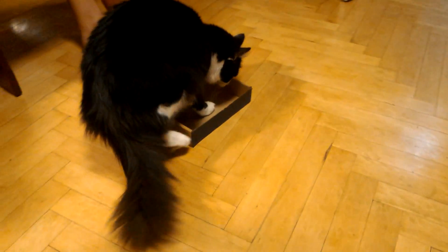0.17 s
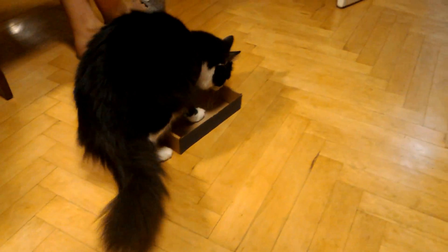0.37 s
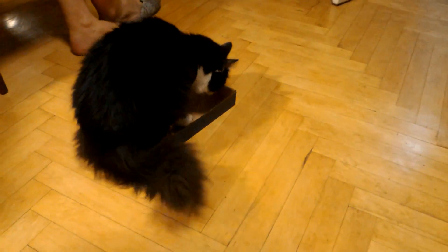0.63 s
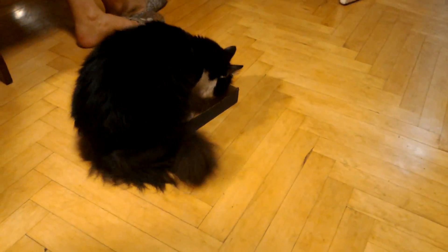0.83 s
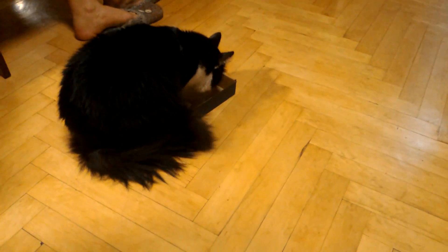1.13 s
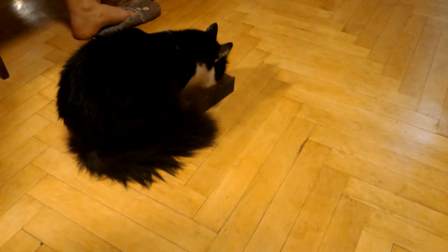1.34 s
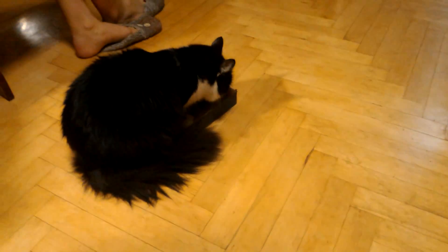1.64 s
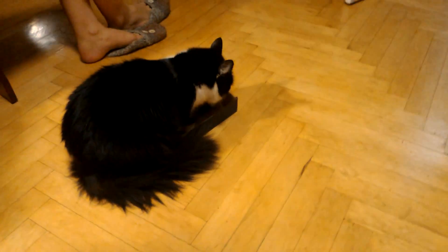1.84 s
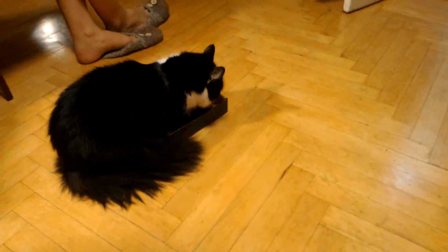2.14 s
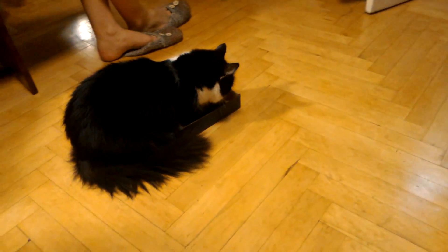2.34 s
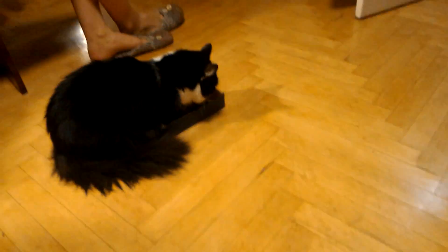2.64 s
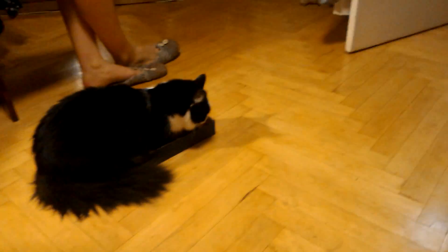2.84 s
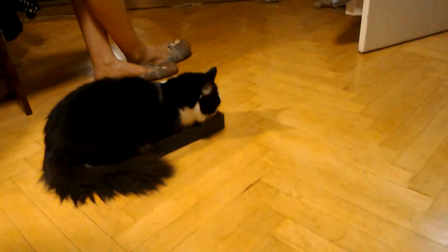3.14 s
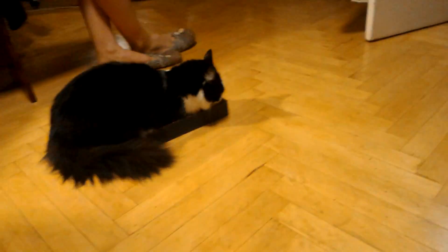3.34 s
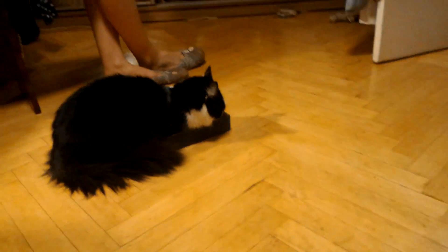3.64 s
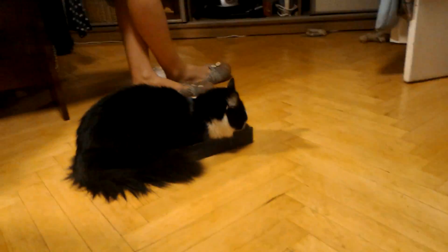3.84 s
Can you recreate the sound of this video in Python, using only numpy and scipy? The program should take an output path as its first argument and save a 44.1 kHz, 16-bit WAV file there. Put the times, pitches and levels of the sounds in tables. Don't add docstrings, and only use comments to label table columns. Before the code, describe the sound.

Handling knocks on a camera's hollow shell, extremely close. Steady soft room hiss comes first, with a tiny sharp tick at 0.7 s and faint dry finger rubs and clicks from 1 s, fuller around 2.4-2.9 s. Three light taps at 3.2-3.3 s lead to hard, thumping, rattling knocks at 3.4, 3.5 and 3.6 s, brief scuffing, then two more around 3.9 s. The cat is nearly silent.

```python
import sys
import numpy as np
from scipy import signal
from scipy.fft import rfft, irfft, next_fast_len
from scipy.io import wavfile
from scipy.ndimage import uniform_filter1d, minimum_filter1d, map_coordinates

SR = 44100
rng = np.random.default_rng(int(sys.argv[2]) if len(sys.argv) > 2 else 0)


def master(y):
    cut = np.clip(np.atleast_2d(y).T, -1, 1)
    pcm = np.round(cut * 32767)
    wavfile.write(sys.argv[1], SR, pcm.astype(np.int16))


def amplitude_ratio(level_db):
    exponent = np.asarray(level_db, float) / 20
    return 10 ** exponent


N = 176400


def unit(x):
    return x / np.sqrt(np.mean(x ** 2) + 1e-20)


def wobble(rate):
    knots = rng.standard_normal(int(N * rate / SR) + 4)
    return map_coordinates(knots, [np.arange(N) * rate / SR])


def filtered(x, response):
    size = next_fast_len(N + 8192)
    gain = response(np.fft.rfftfreq(size, 1 / SR))
    return irfft(rfft(x, size) * gain, size)[..., :N]


def noise(points, grain_db=0):
    f, db = np.transpose(points)
    white = rng.standard_normal(N) * amplitude_ratio(grain_db * rng.standard_normal(N))

    def colour(hz):
        return amplitude_ratio(np.interp(np.log(hz + 1), np.log(f + 1), db, left=-120, right=-120))

    return unit(filtered(white, colour))


def strokes(rows, dull, bright):
    low, high = np.zeros(N + SR), np.zeros(N + SR)
    for s, length, db, grow_db, share_db in rows:
        soft = 0.0037 + 0.086 * length
        t = np.arange(round((length + soft) * SR)) / SR
        onset_ratio = 2.5 if grow_db > 5 else 0.5
        edge = np.clip(np.minimum(t / onset_ratio, length + soft - t) / soft, 0, 1) ** 2
        press = amplitude_ratio(db + grow_db * (t / length - 0.5)) * edge
        at = round((s - soft / 4) * SR)
        low[at:][:len(t)] += press
        high[at:][:len(t)] += press * amplitude_ratio(share_db)
    flutter_db, grain_db = 1.8, 3.5
    dull_skin = amplitude_ratio(flutter_db * wobble(45)) * noise(dull, grain_db)
    bright_skin = amplitude_ratio(flutter_db * wobble(45)) * noise(bright, grain_db)
    return low[:N] * dull_skin + high[:N] * bright_skin


def rings(rows):
    out = np.zeros(N + SR)
    for s, db, hz, ms in rows:
        t = np.arange(round(ms * SR / 1000)) / SR
        u = t / t[-1]
        drift = (hz > 1000) * 0.11 * np.cumsum(rng.standard_normal(len(t)))
        swing = np.sin(2 * np.pi * hz * t + drift)
        soft_start = (1 - np.exp(-u / 0.097)) ** 2
        out[round(s * SR):][:len(t)] += amplitude_ratio(db + 8.5 - 60 * u) * swing * soft_start
    return out[:N]


# (frequency [Hz], level [dB per Hz])
ROOM = [(20, -21.5), (140, 1), (600, -7), (2300, -16), (3400, -21.5), (4800, -22), (6500, -29.5),
        (16200, -20)]
# (frequency [Hz], level [dB per Hz])
WHINE = [(1600, -26), (1800, 0), (2000, -20)]


def room():
    room_db, whine_db = -65, -83
    hiss = amplitude_ratio(room_db + 0.15 * wobble(5.6)) * noise(ROOM)
    return hiss + amplitude_ratio(whine_db) * noise(WHINE)


# (time [s], level [dB])
GRIP = [
    (0, -74.5),
    (2.3, -70.5),
    (2.9, -72.5),
    (3.38, -52.5),
    (3.5, -37.5),
    (3.75, -50),
    (4, -44),
]


def hand_rumble():
    grip_db = np.interp(np.arange(N) / SR, *np.transpose(GRIP))
    lump_db = 4.5
    return noise([(15, -3), (45, 0), (130, -22)]) * amplitude_ratio(grip_db + lump_db * wobble(25.01))


# (time [s], peak [dB], pitch [Hz], ring [ms])
TICKS = [(.7328, -27, 4670, 4.6), (.7328, -28.5, 7350, 4.1), (.7328, -25, 10300, 1.1),
         (.7328, -28, 14000, 1.6), (1.386, -48, 394, 12), (1.4755, -39.5, 5240, 6.5),
         (1.4755, -47, 10200, 4.4), (1.477, -42.5, 356, 7.5), (2.769, -36.5, 4700, 7.6),
         (3.623, -37, 800, 3.2), (3.721, -34.5, 440, 4.6), (3.8365, -30, 1200, 3.6),
         (3.8365, -38.5, 8200, 1.1), (3.846, -32, 460, 4.8), (1.773, -53, 59.7, 72), (2.776, -53, 45, 120)]


def nail_ticks():
    return rings(TICKS)


# (time [s], peak [dB], low edge [Hz], high edge [Hz])
SNAPS = [(.7331, -46.5, 1900, 2920), (1.3857, -49, 4000, 8000), (1.7734, -46, 3500, 8000),
         (1.904, -48, 6500, 15000), (1.9307, -51, 6500, 15000), (2.097, -59, 5940, 9100),
         (2.202, -59, 3500, 7000), (2.7688, -44, 1000, 6000), (2.7698, -34.5, 7500, 15500),
         (3.094, -45, 1800, 4500), (3.281, -36, 3500, 12000), (3.789, -54, 500, 2800),
         (3.8013, -51, 400, 2200), (3.812, -63, 1500, 2400), (3.8223, -50, 800, 2400),
         (3.834, -57, 600, 3000), (3.8375, -46, 1210, 3100), (3.87, -43, 400, 2600)]


def snaps():
    out = np.zeros(N + SR)
    t = np.arange(SR // 100) / SR
    t60 = 0.0026
    for s, db, low_hz, high_hz in SNAPS:
        burst = rng.standard_normal(len(t)) * amplitude_ratio(-60 * t / t60)
        band = signal.butter(4, [low_hz, high_hz], 'band', fs=SR, output='sos')
        burst = signal.sosfilt(band, burst)
        out[round(s * SR):][:len(t)] += amplitude_ratio(db) * burst / np.abs(burst).max()
    return out[:N]


# (time [s], length [s], level [dB], growth [dB], bright share [dB])
SLIDES = [(1.03, 0.094, -76.5, -4, -20), (1.21, 0.135, -75.5, 6, -3), (1.385, 0.083, -70.5, 0, -2.5),
          (1.478, 0.014, -59.5, -11, -14), (1.505, 0.028, -66, -4, -6), (1.625, 0.064, -75.5, -6, -7),
          (1.772, 0.057, -67.5, -2, -3.5), (1.943, 0.025, -56, 25, 7.5), (1.966, 0.022, -62, -13, 7.5),
          (2.17, 0.43, -76.5, 5, -2.5), (2.25, 0.0077, -64.5, -3, -5), (2.372, 0.058, -59, 6, -6),
          (2.476, 0.053, -61.5, 4, 4.5), (2.53, 0.11, -68, 23, -7), (2.6, 0.14, -49.5, 7.5, -9.5),
          (2.75, 0.095, -67, -14, -6), (2.775, 0.019, -61.5, -4, 0.5), (2.892, 0.056, -58, 0, -6),
          (2.89, 0.29, -69.5, -3, 3.5), (2.97, 0.02, -74, -5, -8), (3.045, 0.024, -67, 3, -1),
          (3.012, 0.023, -61.5, -1, -9), (3.135, 0.044, -73, 3.5, 8)]
GRIPS = [
    (0.736, 0.019, -63.5, -7, 1.4),
    (3.231, 0.033, -59.5, -16, 2.6),
    (3.282, 0.034, -63.5, -23, 1.7),
    (3.318, 0.037, -54, -7, 2),
    (3.215, 0.167, -72.5, -8, 1.8),
    (3.425, 0.04, -76.5, -15, 8),
    (3.492, 0.045, -71, -3, 3.8),
    (3.55, 0.04, -76.5, 6, 8.9),
    (3.596, 0.03, -67, -13, 4.4),
    (3.628, 0.085, -71, -1, 2.5),
]
# (frequency [Hz], level [dB per Hz])
DULL = [(1500, -40), (3200, -16), (4200, -10), (4850, -5), (6000, -7), (7600, 2), (9000, -8), (16200, -27)]
BRIGHT = [(4500, -22), (7000, -9), (9500, 2.5), (12000, -4), (14500, -2.5), (16200, -12)]


def finger_slides():
    return strokes([*SLIDES, *GRIPS], DULL, BRIGHT)


# (time [s], length [s], level [dB], growth [dB], upper share [dB])
RUBS = [(1.05, 0.11, -81.5, 3, -5), (1.2, 0.18, -75.5, 0, -5), (1.385, 0.078, -67.5, 2, 0),
        (1.505, 0.032, -65, -4, -9), (1.625, 0.044, -75.5, -4, -17), (1.772, 0.039, -68.5, -9, -1),
        (2.385, .05, -66, 3, -13), (2.53, 0.13, -74, -2, -16), (2.62, 0.134, -73, 6, -10),
        (2.895, 0.3, -66, -9, -33), (3.2, 0.09, -67, 7, -8), (3.282, .08, -61.5, -4, -18)]
# (frequency [Hz], level [dB per Hz])
SHELL_LOW = [(3600, -26), (4400, -6.5), (4800, -1.5), (5400, -7.5), (6200, -12)]
SHELL_HIGH = [(5600, -29), (6300, -1), (6800, 10), (7400, -5), (8300, -36)]


def shell_rubs():
    return strokes(RUBS, SHELL_LOW, SHELL_HIGH)


# (time [s], peak [dB], pitch
# [Hz], ring [ms])
SHIFTS = [(1.386, -49, 59.3, 47), (1.476, -44, 40.2, 150), (1.945, -47, 86, 89), (2.434, -46, 51, 96),
          (2.971, -42.5, 57, 46), (3.424, -28.5, 45, 190), (3.494, -12.5, 104.7, 64), (3.511, -30, 54, 70),
          (3.557, -37, 376, 23), (3.602, -24.5, 48, 40), (3.907, -25.5, 29, 120)]


def hand_shifts():
    return rings(SHIFTS)


# (time [s], length [s], level [dB], growth [dB], bright share [dB])
DRAGS = [(2.39, 0.042, -80, -1, 13.5), (2.62, 0.12, -78, 16.5, 12), (2.772, 0.028, -65.5, -8, 6),
         (3.13, 0.05, -62, 5, -3.5), (3.235, 0.036, -59, -27, -8), (3.281, .03, -54.5, -20, -7),
         (3.32, 0.014, -52, 1, 8), (3.337, 0.023, -51, -1, 9), (3.42, 0.062, -54, -5.5, -18.5),
         (3.49, 0.0056, -35, 15, -24), (3.376, 0.0044, -49, 3, -1), (3.4, 0.017, -39.5, 7, -18),
         (3.925, 0.026, -48, 12, -29), (3.53, 0.058, -57, 12, -8), (3.6, .02, -52, -22, 0),
         (3.628, 0.098, -60.5, -6, -10), (3.74, 0.105, -63.5, 19.5, -36), (3.872, .02, -52, 4, -32),
         (1.958, 0.011, -62, 4, 2.5)]
# (frequency [Hz], level [dB per Hz])
DRAG_LOW = [(40, -6), (150, 9.5), (500, 6), (1200, -2), (2500, -30), (5000, -84)]
DRAG_HIGH = [(600, 3.5), (1500, 2), (2400, 4.5), (3200, 7.5), (4700, -5), (6000, -48)]


def palm_drags():
    return strokes(DRAGS, DRAG_LOW, DRAG_HIGH)


# (time [s], peak [dB], crack [dB])
TAPS = [
    (3.2338, -16.5, -38),
    (3.28, -15.5, -31),
    (3.3178, -12, -23),
]


def taps():
    out = np.zeros(N)
    u = np.arange(SR // 20) / SR
    crack = 0.5 * noise(RATTLE[2:]) + noise(DULL[:5]) + 0.75 * noise(BRIGHT)

    def bump(width_s):
        return u / width_s * np.exp(1 - u / width_s)

    push = 1.56 * (bump(0.00029) - 0.58 * bump(0.00046))
    for s, db, crack_db in TAPS:
        at = slice(round(s * SR), round(s * SR) + len(u))
        out[at] += amplitude_ratio(db) * push
        out[at] += amplitude_ratio(crack_db - 60 * u / 0.0063) * crack[at]
    return out


# (time [s], suction [dB], rebound [dB], rattle [dB], rattle length [s])
KNOCKS = [
    (3.3811, -31, -22.5, -22.5, 0.018),
    (3.415, -2, -10, -22, 0.014),
    (3.5, -3.5, -3, -27, 0.015),
    (3.5922, -3, -9.5, -24.5, 0.013),
    (3.8951, -2, -8, -17, 0.01),
    (3.9383, -15, -8, -21.5, 0.01),
]
REBOUND_PITCH = [0.9, 0.92, 1.14, 0.88, 0.92, 0.91]
# (frequency [Hz], level [dB per Hz])
RATTLE = [(150, -17), (500, -0.5), (1500, -4), (2500, -8.5), (4500, -21), (6300, -41), (9500, -24),
          (16200, -28)]


def knocks():
    out = np.zeros(N + SR)
    rattle = np.pad(noise(RATTLE, 2.1), (0, SR))
    suck_s, rebound_hz, rebound_t60, rebound_lag_s, sag = 0.00017, 105.7, 0.04, 0.00032, 13
    rattle_fall_db, rattle_end_s = 23.5, 0.003
    u = np.arange(-SR // 100, SR // 10) / SR
    spike = np.exp(-np.where(u < 0, -u / (1.09 * suck_s), (u / suck_s) ** 2))
    v = np.clip(u - rebound_lag_s, 0, 1)
    turn = 2 * np.pi * rebound_hz * v / (1 + sag * v)
    kick = 1.34 * (1 - np.exp(-v / 0.00093))
    for (s, suck_db, back_db, rattle_db, length), pitch in zip(KNOCKS, REBOUND_PITCH):
        start = round((s + u[0]) * SR)
        at = slice(start, start + len(u))
        back = amplitude_ratio(back_db + 2.5 - 60 * v / rebound_t60) * np.sin(pitch * turn + kick)
        fade = np.clip(u / suck_s / 2, 0, 1) * np.clip((length - u) / rattle_end_s, 0, 1)
        shake = fade * amplitude_ratio(rattle_db + 4.0 - rattle_fall_db * np.clip(u / length, 0, 1))
        out[at] += back - amplitude_ratio(suck_db) * spike + shake * rattle[at]
    return out[:N]


# (time [s], peak [dB], pitch [Hz], ring [ms])
BODY = [
    (3.3803, -9.5, 1250, 5.3),
    (3.3845, -21, 166, 38),
    (3.4155, -16, 793, 17.3),
    (3.4195, -16.5, 680, 11),
    (3.5045, -24.5, 478, 21),
    (3.5925, -31, 420, 11),
    (3.592, -14.5, 2124, 7.7),
    (3.8955, -24, 860, 18),
    (3.8955, -14.5, 1400, 7.6),
]


def shell_rings():
    return rings(BODY)


# (time [s], length [s], level [dB], growth [dB], upper share [dB])
SCUFFS = [
    (3.628, .035, -66, 3, -13),
    (3.665, 0.044, -62.5, -6, -21),
]
# (frequency [Hz], level [dB per Hz])
SCUFF = [(1500, -19), (2000, -1), (2400, 3), (2900, -12), (3600, -27)]


def palm_scuffs():
    return strokes(SCUFFS, SCUFF, SHELL_LOW)


def ducking(loud):
    from_db, slope, hold_s = -25.5, 0.43, 0.038
    level_db = 20 * np.log10(np.abs(loud) + 1e-6)
    hold = int(hold_s * SR)
    cut_db = np.minimum(0, slope * (from_db - level_db))
    held_db = minimum_filter1d(cut_db, hold, origin=(hold - 1) // 2)
    return amplitude_ratio(uniform_filter1d(held_db, size=200))


def scene():
    loud = knocks() + taps()
    background = ducking(loud) * room() + hand_rumble()
    touch = nail_ticks() + snaps() + finger_slides() + shell_rubs()
    hand = hand_shifts() + palm_drags() + palm_scuffs()
    quiet_top_hz = 15850
    quiet = filtered(background + touch + hand, lambda hz: 1 / (1 + (hz / quiet_top_hz) ** 200))
    return (loud + shell_rings() + quiet)[None]


def low_pass(x):
    return signal.sosfilt(signal.butter(12, 17110, fs=SR, output="sos"), x)


def record(dry):
    top_hz = 16700
    mix = filtered(dry, lambda hz: 1 / (1 + (hz / top_hz) ** 60))
    return low_pass(mix)


dry = scene()
out = record(dry)
master(out)
```